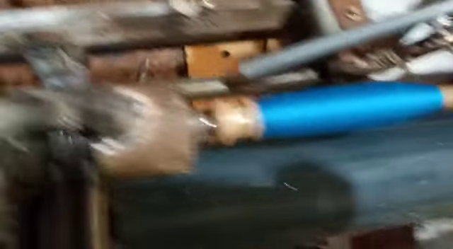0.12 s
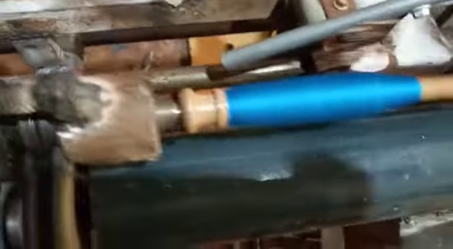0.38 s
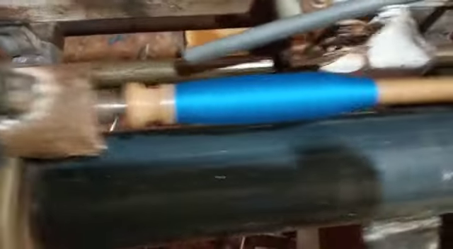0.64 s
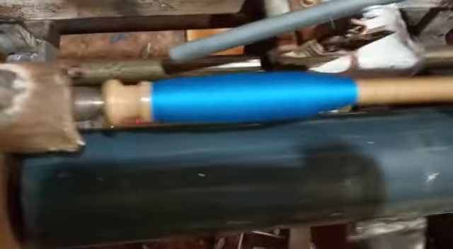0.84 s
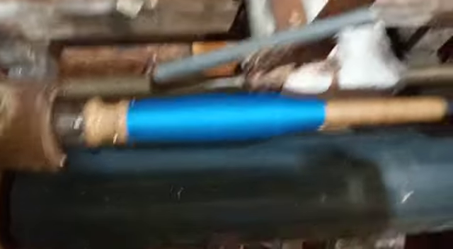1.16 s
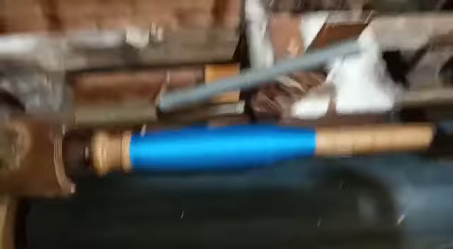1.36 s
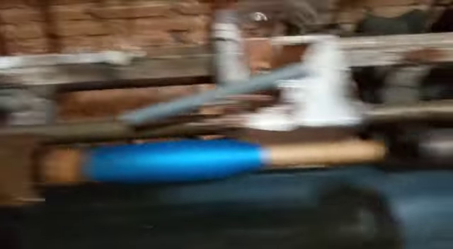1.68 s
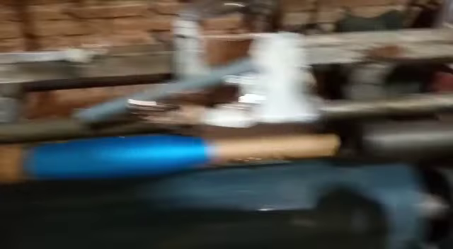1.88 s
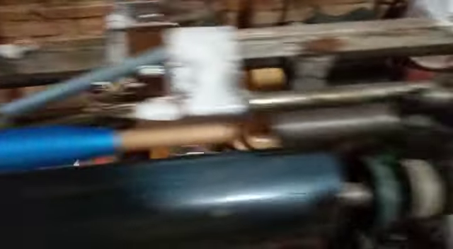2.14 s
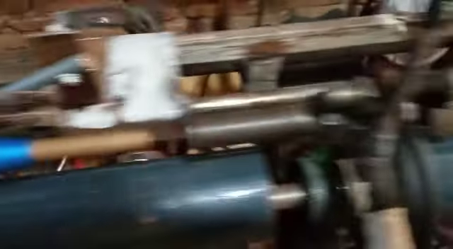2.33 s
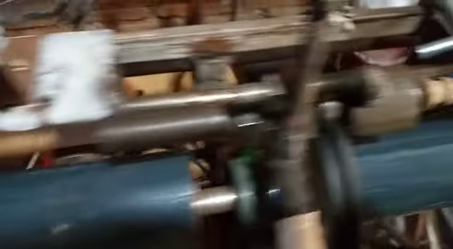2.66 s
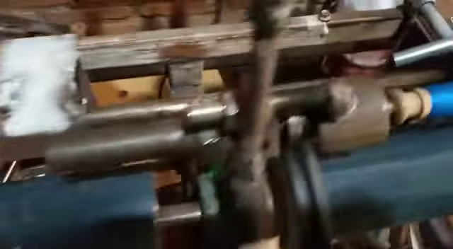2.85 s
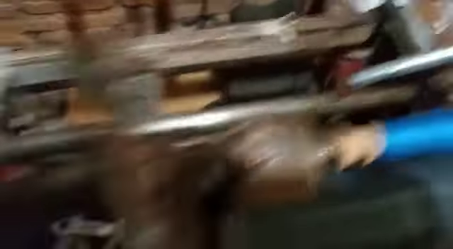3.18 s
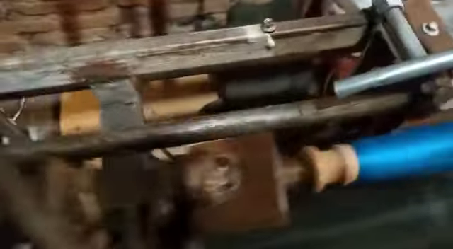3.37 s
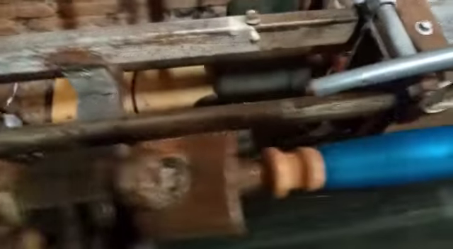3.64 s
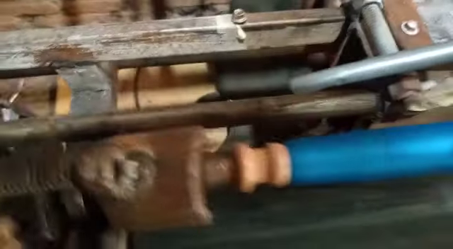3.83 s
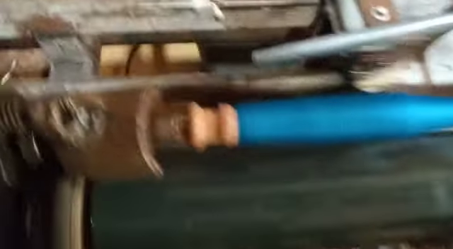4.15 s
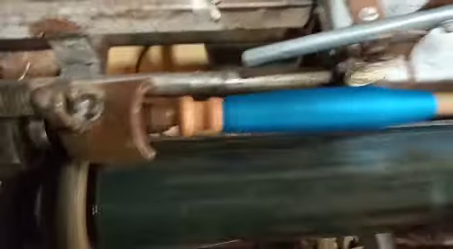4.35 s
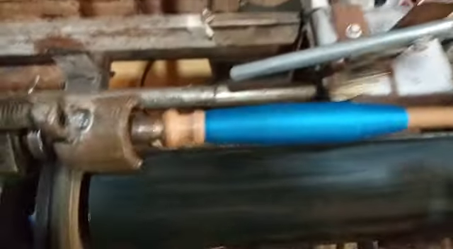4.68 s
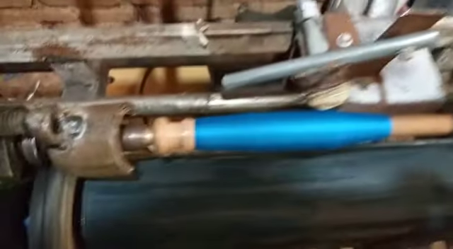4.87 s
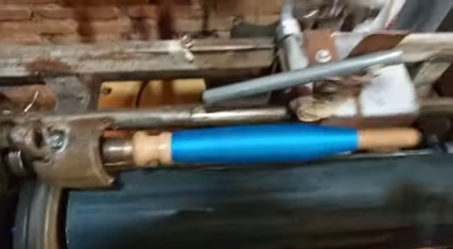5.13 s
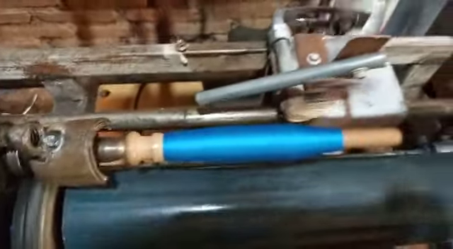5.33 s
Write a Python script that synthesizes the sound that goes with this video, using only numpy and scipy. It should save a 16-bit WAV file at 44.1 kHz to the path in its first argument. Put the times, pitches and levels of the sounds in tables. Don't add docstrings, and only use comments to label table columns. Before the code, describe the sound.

Close, loud roar of a row of yarn winders with ringing metallic whine, rapid ticking, and a sharp high squeak about every 0.7 seconds.

```python
import sys
import numpy as np
from scipy import signal
from scipy.fft import rfft, irfft
from scipy.io import wavfile
from scipy.ndimage import uniform_filter1d

SR = 44100
rng = np.random.default_rng(int(sys.argv[2]) if len(sys.argv) > 2 else 0)


def store_wav(level_fs):
    pcm = np.round(np.clip(np.atleast_2d(level_fs), -1, 1) * 32767)
    wavfile.write(sys.argv[1], SR, pcm.T.astype(np.int16))


def magnitude_from_level(level_db):
    exponent = np.asarray(level_db, float) / 20
    return 10 ** exponent


N = 242770
SHAFT_HZ = 48.7

# frequency in Hz, level in dB per Hz.
LEFT_COLOUR = [(30, -32), (80, -22.5), (300, -18), (600, -14), (800, -8), (1050, -11), (1900, -2),
               (2800, -4.5), (5200, -7), (6800, -5), (9800, -17.5), (13000, -39.5), (14000, -22),
               (16000, -37)]
RIGHT_COLOUR = [(30, -25), (80, -18), (300, -15), (600, -9), (800, -3), (1050, -8.5), (1900, -2),
                (2800, -6), (5200, -6.5), (6600, -12), (8100, -25.5), (11800, -11.5), (13900, -25),
                (16000, -21)]
# time in seconds, place from 0 (one end) to 1 (the other).
PLACE_ALONG = [(0, 0.42), (.6, 0.01), (1.9, 0.15), (2.4, 0.56), (2.8, 0.4), (3.4, 0.61), (3.8, 0.89),
               (4.4, 0.91), (5.5, 0.84)]
# time in seconds, knock peak in dB.
SPOOL_NEARNESS = [(0, -22), (.3, -21), (.52, -18.5), (.66, -24), (.95, -21), (1.1, -31), (1.35, -25),
                  (1.6, -32), (2.7, -31), (2.92, -24), (3.15, -31), (3.95, -33), (4.1, -26), (4.6, -26),
                  (4.85, -31), (5.5, -35)]


def rms_one(x):
    return x / np.sqrt(np.mean(x ** 2) + 1e-20)


def in_time(rows):
    s, *columns = np.transpose(rows)
    return [np.interp(np.arange(N) / SR, s, c) for c in columns]


def at_hz(points, hz):
    table_hz, value = np.transpose(points)
    return np.interp(np.log(hz), np.log(table_hz), value)


def drift(rate):
    r = np.exp(-80 * np.pi * rate / SR)
    white = rng.standard_normal(N // 40 + 2002)
    slow = signal.lfilter([1], [1, -2 * r, r * r], white)[2000:]
    return np.interp(np.arange(N) / 40, np.arange(len(slow)), rms_one(slow))


def resonate(x, hz, width):
    r = np.exp(-np.pi * width / SR)
    poles = [1, -2 * r * np.cos(2 * np.pi * hz / SR), r * r]
    return signal.lfilter([(1 - r * r) / 2, 0, (r * r - 1) / 2], poles, x)


def bandpass(x, order, low, high):
    return signal.sosfilt(signal.butter(order, [low, high], "band", fs=SR, output="sos"), x)


def late(x):
    return np.roll(x, round(0.0008 * SR))


def pair(white, hz):
    # frequency in Hz, shared part of left and right from 0 to 1.
    likeness = [(60, 1), (260, 0.84), (600, 0.61), (900, 0.13), (1050, 0.51), (2000, 0.017), (15000, 0.017)]
    alike = np.clip(at_hz(likeness, hz), 0, 1)
    shared = np.array([late(white[0]), white[0]])
    return np.sqrt(alike) * shared + np.sqrt(1 - alike) * white[1:]


def roar(patchy_db, beat_depth):
    out, together = 0, drift(18.0)
    edges = 28 * 2 ** np.arange(0, 9.6, .5)
    white = rng.standard_normal((2, 3, N))
    for k, (low, high) in enumerate(zip(edges, edges[1:])):
        band = pair(bandpass(white[k % 2], 2, low, high), np.sqrt(low * high))
        out = out + band * magnitude_from_level(patchy_db * (0.8 * together + drift(20.0)))
    hz = np.arange(1, N // 2 + 2) * SR / N
    colour_db = np.array([at_hz(LEFT_COLOUR, hz), at_hz(RIGHT_COLOUR, hz)])
    out = irfft(rfft(out) * magnitude_from_level(colour_db), N)
    beat = 1 + beat_depth * np.cos(2 * np.pi * SHAFT_HZ * np.arange(N) / SR)
    return beat * out / np.sqrt(np.mean(out ** 2, axis=1, keepdims=True))


def steady(line, share):
    fading = np.sqrt(uniform_filter1d(line ** 2, size=400, axis=1) + .02)
    return rms_one(line / fading ** share)


def frame(place, wander_db):
    # frequency in Hz, width in Hz, level in dB at place 0, half-way and place 1,
    # depth of the shaft beat from 0 to 1.
    modes = [(391, 15.6, -31.5, -36, -28, 0), (478.3, 9.3, -22.5, -28.5, -27.5, 0),
             (727, 59, -34, -23.5, -20, 0.63), (912, 15, -24, -25.5, -23, 0),
             (1203, 15, -43, -18.5, -16.5, 0.35), (1491, 9.1, -13.5, -20.5, -24, 0.83),
             (1541, 25, -17, -28, -24, 0.24), (1588, 46, -17, -22, -25, 0.05),
             (1874, 14, -18, -19, -14.5, 0.2), (1974, 18, -10, -12.5, -15.5, 0.35),
             (2061, 27, -24, -13.5, -23, 0.14), (2350, 23, -18, -37, -19.5, 0),
             (2600, 54, -22, -22, -26, 0.6), (3112, 22, -19, -16, -17.5, 0.42),
             (3417, 54, -19, -21, -28, .4), (4095, 28, -19.5, -22, -24, .4),
             (4310, 120, -22, -14, -14.5, 0.1), (5780, 52, -33, -27, -18, 0.1),
             (6440, 82, -19, -31, -17, 0.45)]
    out, white = 0, rng.standard_normal((3, N))
    turn = 2 * np.pi * SHAFT_HZ * np.arange(N) / SR
    for hz, width, *levels_db, depth in modes:
        once = resonate(pair(white, hz / 3.46), hz, width * 1.5)
        line = steady(rms_one(resonate(once, hz, width * 1.5)), share=0.48)
        level = magnitude_from_level(np.interp(place, [0, .5, 1], levels_db) + wander_db * drift(4.0))
        out = out + line * level * (1 + depth * np.cos(turn + rng.uniform(0, 2 * np.pi)))
    return out


def whir():
    roar_db, pan_db, _ = in_time(WALK_LEVELS)
    ridge_db = -23.5 + 1.2 * (roar_db - roar_db.mean())
    lean = magnitude_from_level(3.0 + np.array([pan_db, -pan_db]) / 2)
    ringing = frame(in_time(PLACE_ALONG)[0], wander_db=1.5) * magnitude_from_level(ridge_db)
    return lean * (magnitude_from_level(roar_db - 0.5) * roar(patchy_db=1.2, beat_depth=0.063) + ringing)


# time in seconds, roar in dB, left over right in dB, floor rumble in dB.
WALK_LEVELS = [(0.0, -24, 7.5, -48), (0.5, -25.5, 6.5, -63), (0.7, -23.5, 7.5, -48), (1.2, -24, 7, -47.5),
               (1.8, -24, 7, -49.5), (2.6, -23.5, 8, -50), (2.85, -23, 7.5, -44), (3.4, -23.5, 7.5, -51),
               (4.1, -24, 7.5, -46.5), (4.5, -24, 6.5, -46.5), (5.5, -23, 7.5, -39.5)]


def hum():
    # time in seconds, pitch in Hz.
    pitch = [(0, 80.2), (1.6, 81.9), (1.85, 69.3), (2.1, 80.4), (2.6, 79.4), (3.2, 95.7), (3.8, 72.5),
             (4.3, 88), (5.2, 98.2), (5.5, 91)]
    # time in seconds, level in dB.
    swell = [(0.0, -69), (0.17, -45), (0.4, -45), (0.66, -52), (0.76, -59), (0.93, -48), (1.03, -54),
             (1.21, -47), (1.55, -46.5), (1.73, -58), (1.82, -51), (2.05, -49), (2.9, -68), (3.3, -50),
             (3.7, -75), (3.88, -56), (4.43, -58), (5.3, -48.5)]
    wander_hz = (2.4 + 8.0 * in_time(PLACE_ALONG)[0]) * drift(8.8)
    phase = 2 * np.pi * np.cumsum(in_time(pitch)[0] + wander_hz) / SR
    tone = np.sqrt(2) * np.sin(phase) * magnitude_from_level(in_time(swell)[0])
    return np.array([late(tone) * magnitude_from_level(3.0), tone * magnitude_from_level(-1.7)])


def rumble():
    level_db = in_time(WALK_LEVELS)[2] - 2.5
    band = bandpass(pair(rng.standard_normal((3, N)), 200), 2, 75, 330)
    return rms_one(band) * magnitude_from_level(level_db + np.array([[1.8], [-1.8]]))


def port_hiss():
    band = bandpass(rng.standard_normal((2, N)), 3, 14350, 16300)
    peaked = rms_one(band + .7 * resonate(band, 15100, 400))
    near_db, = in_time(SPOOL_NEARNESS)
    level_db = -40 + 0.49 * (near_db - near_db.mean())
    return peaked * magnitude_from_level(level_db + np.array([[0.5], [5.5]]) + drift(25.0))


def knock_train():
    strokes = [
        0.0059,
        0.6401,
        1.305,
        1.966,
        2.7,
        3.33,
        4.032,
        4.723,
    ]
    turn_s, jitter_s, scatter_db = 1 / 31.7, .0016, 2.2
    ends = [*strokes[1:], N / SR]
    s = np.concatenate([np.arange(a, b - turn_s / 2, turn_s) for a, b in zip(strokes, ends)])
    chance = rng.standard_normal((200, 2))[:len(s)]
    peak_db = np.interp(s, *np.transpose(SPOOL_NEARNESS)) + scatter_db * chance[:, 1]
    clicks = np.zeros(N)
    clicks[((s + jitter_s * chance[:, 0]) * SR).astype(int)] = magnitude_from_level(peak_db)
    return clicks


def ticks(lift_db, scrape_s):
    # frequency in Hz, level in dB, ring time to -60 dB in seconds.
    modes = [(14800, 3.0, 0.016), (15700, -5, .01), (13100, -22, .006), (12000, -6, 0.012),
             (9840, -11, 0.002), (6700, -1, 0.005)]
    clicks = knock_train() * magnitude_from_level(lift_db)
    r = np.exp(-1 / (scrape_s * SR))
    scrape = signal.lfilter([1 - r], [1, -2 * r, r * r], clicks + 1e-18)
    burst = scrape * rng.standard_normal((len(modes), 2, N))
    burst = burst + 0.7 * clicks
    out = np.zeros((2, N))
    for noise, (hz, level_db, t60) in zip(burst, modes):
        ring = resonate(noise, hz, 2.2 / t60) * magnitude_from_level(level_db)
        lean_db = np.clip(at_hz(LEFT_COLOUR, hz) - at_hz(RIGHT_COLOUR, hz) + 1.2, -12, 8)
        out += np.array([late(ring[0]) * magnitude_from_level(lean_db / 2), ring[1] * magnitude_from_level(-lean_db / 2)])
    return out


def rattles(lift_db, width):
    # time in seconds, peak in dB, pitch in Hz.
    touches = [(0.1037, -21.5, 6400), (0.165, -16, 6400), (0.1965, -22, 6300), (0.2598, -16, 6800),
               (0.2917, -25, 6400), (0.385, -23, 6450), (0.4179, -22, 6540), (0.4813, -15, 6740),
               (0.5152, -25, 6600), (0.828, -32, 6410), (1.5254, -20, 6540), (1.6511, -21, 6390),
               (4.3594, -28, 6400), (4.573, -20, 6380), (4.7885, -18, 6530), (4.8289, -38, 6430),
               (4.8823, -35, 6650), (5.2144, -17, 6600), (5.4291, -20, 6600), (4.6, -19, 8150),
               (4.77, -22, 8110), (4.81, -40, 5710)]
    out, t = np.zeros(N + 900), np.arange(900) / SR
    for (s, level_db, hz), noise in zip(touches, rng.standard_normal((len(touches), 900))):
        touch = resonate(noise * np.exp(-t / 0.009), hz, width)
        at = round(s * SR)
        out[at:at + 900] += magnitude_from_level(level_db + lift_db) * touch / np.abs(touch).max()
    return np.array([late(out[:N]) * magnitude_from_level(8.0), out[:N] * magnitude_from_level(-8.0)])


def slips(events, rest_hz, sag_hz_per_db, free_db, sag_s, settle_s):
    levels, pitches = [], []
    for s, hold, level_db, release, pan_db in events:
        times = s + np.cumsum([0, .011, hold, release, 0.021])
        drops = np.cumsum([-62, 62, -3, -23, -3])
        levels.append([(t, level_db + drop, pan_db) for t, drop in zip(times, drops)])
        sag = sag_hz_per_db * max(level_db - free_db, 0)
        lowest_s = s + sag_s
        pitches.append([(s, rest_hz - .3 * sag), (lowest_s, rest_hz - sag), (lowest_s + settle_s, rest_hz)])
    return levels, pitches


def squeak(tables, pitches, lift_db, rough, flutter_db, drive_s, tail_s):
    out = np.zeros((2, N))
    for rows, pitch in zip(tables, pitches):
        s, level_db, pan_db = np.transpose(rows)
        t = np.arange(s[0], min(s[-1] + tail_s, N / SR - .002), 1 / SR)
        fade_db = -30 * np.clip(t - s[-1], 0, None) / tail_s
        fade_db = fade_db - 20 * np.clip(1 - (t - s[0]) / 0.004, 0, 1)
        wobble = rng.standard_normal((3, 6000))[:, :len(t) // 40 + 2]
        wobble = uniform_filter1d(wobble, size=5, axis=1)
        slow = [np.interp(np.arange(len(t)) / 40, np.arange(len(w)), w) for w in wobble]
        drive = np.exp(-((t - s[0]) / drive_s) ** 2)
        phase = 2 * np.pi * np.cumsum(np.interp(t, *np.transpose(pitch))) / SR
        at = round(s[0] * SR)
        for side, sign in enumerate((1, -1)):
            heard_db = np.interp(t, s, level_db + sign * pan_db / 2) + lift_db + fade_db
            gain = magnitude_from_level(heard_db + flutter_db * drive * slow[side])
            out[side, at:at + len(t)] += gain * np.sin(phase + rough * drive * slow[2] + 1.25 * side)
    return out


def guide_squeaks():
    # start in seconds, hold in seconds, level in dB, release in seconds, left over right in dB.
    reversals = [
        (.553, 0.036, -16, 0.014, 12),
        (1.243, 0.012, -15, .046, 6),
        (1.932, 0.028, -17.5, 0.064, 5),
        (2.622, 0.0044, -10.5, 0.035, 9),
        (3.314, 0.013, -16.5, .034, 2),
        (4.0, 0.003, -11, 0.036, -3),
        (4.671, .012, -16, 0.066, -5),
        (5.36, 0.045, -21.5, 0.025, -5),
    ]
    levels, pitches = slips(reversals, 10608, sag_hz_per_db=30, free_db=-19, sag_s=.016, settle_s=.04)
    guide = squeak(levels, pitches, lift_db=3.0, rough=3.0, flutter_db=7.0, drive_s=0.054, tail_s=.035)
    return guide + magnitude_from_level(3.0) * resonate(guide, 10588, 35)


def neighbour_squeals():
    # start in seconds, hold in seconds, level in dB, release in seconds, left over right in dB.
    squeals = [
        (2.668, 0.078, -20.5, 0.052, 23.5),
        (3.362, 0.077, -27, .06, 16),
        (4.04, 0.052, -28, .015, 14),
    ]
    levels, pitches = slips(squeals, 7290, sag_hz_per_db=14, free_db=-35, sag_s=.03, settle_s=.06)
    squeal = squeak(levels, pitches, lift_db=0.5, rough=1.3, flutter_db=10.5, drive_s=.1, tail_s=.03)
    return squeal + magnitude_from_level(-4.0) * (resonate(squeal, 7147, 33) + resonate(squeal, 7248, 30))


def scene():
    running = whir() + hum() + rumble() + port_hiss()
    knocks = ticks(lift_db=22.5, scrape_s=0.0012) + rattles(lift_db=-2.0, width=110)
    return running + knocks + guide_squeaks() + neighbour_squeals()


def top_cut(x):
    return signal.sosfilt(signal.butter(12, 16990, fs=SR, output="sos"), x)


def record(dry):
    threshold_db, ratio, release_db_s, attack_s, ahead_s = -23.5, 0.5, 213, 0.0091, 0.013
    bright = signal.sosfilt(signal.butter(2, 6000, "high", fs=SR, output="sos"), dry)
    level_db = 10 * np.log10(uniform_filter1d(np.mean(bright ** 2, axis=0), size=300) + 1e-12)
    fall = release_db_s * np.arange(N) / SR
    held_db = np.maximum.accumulate(level_db + fall) - fall
    r = np.exp(-1 / (attack_s * SR))
    duck_db = signal.lfilter([1 - r], [1, -r], -ratio * np.clip(held_db - threshold_db, 0, None))
    duck_db = np.interp(np.arange(N) + ahead_s * SR, np.arange(N), duck_db)
    bass = signal.sosfilt(signal.butter(2, 650, fs=SR, output="sos"), dry)
    mix = (dry - bass) * magnitude_from_level(duck_db) + bass * magnitude_from_level(3.0 * duck_db)
    mix = signal.sosfilt(signal.ellip(10, .5, 48, 15850, fs=SR, output="sos"), mix)
    return top_cut(mix)


dry = scene()
out = record(dry)
store_wav(out)
```